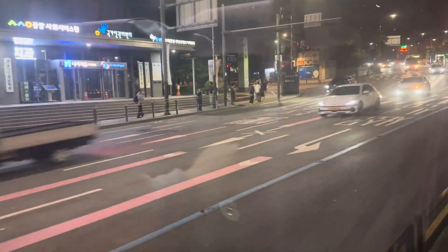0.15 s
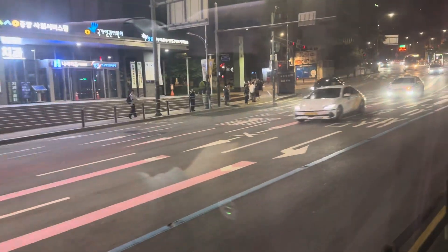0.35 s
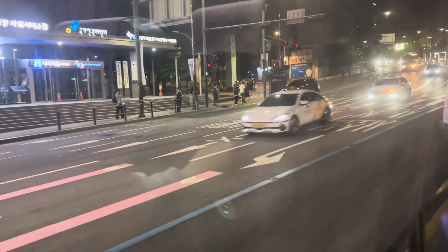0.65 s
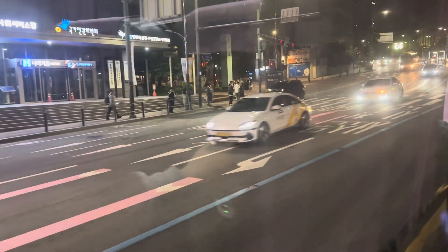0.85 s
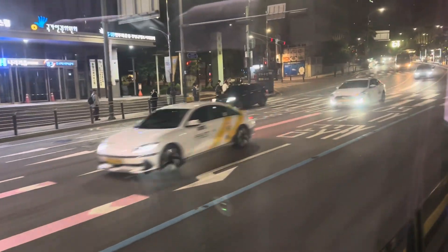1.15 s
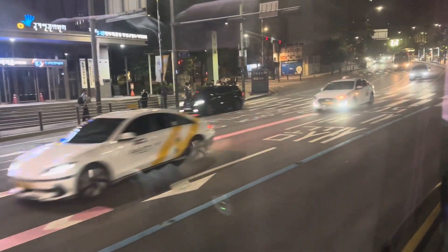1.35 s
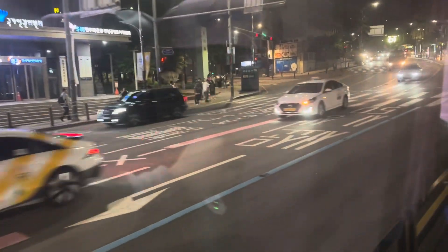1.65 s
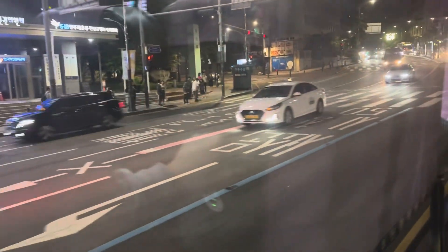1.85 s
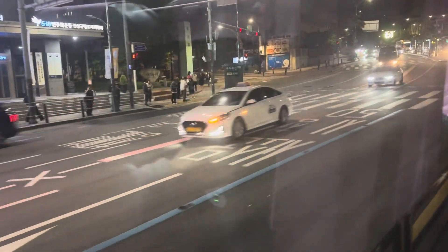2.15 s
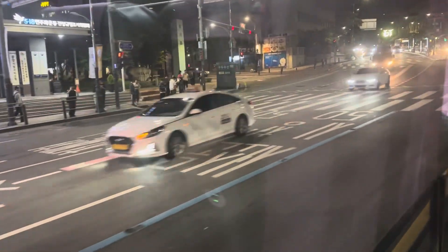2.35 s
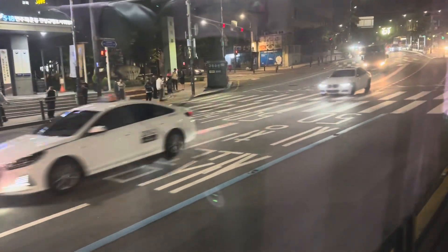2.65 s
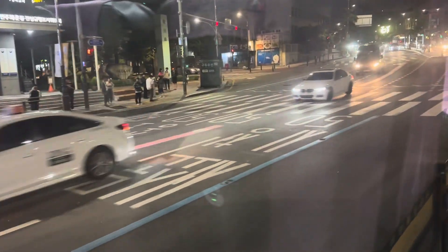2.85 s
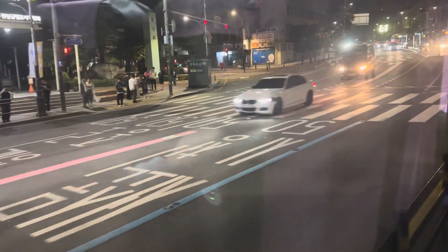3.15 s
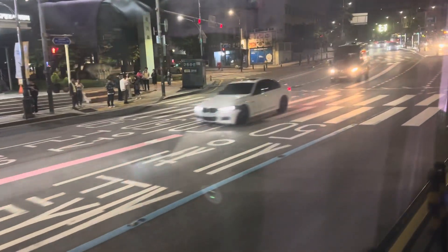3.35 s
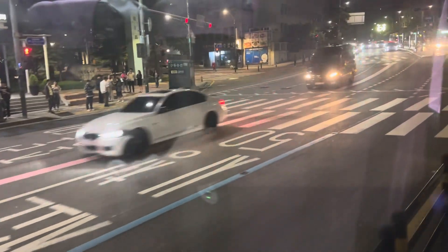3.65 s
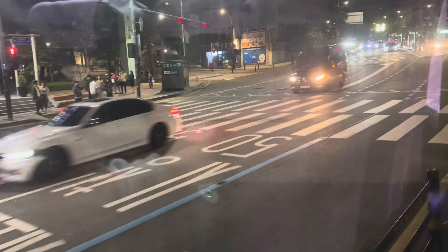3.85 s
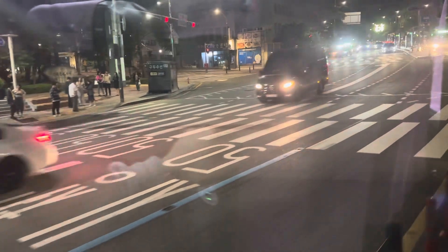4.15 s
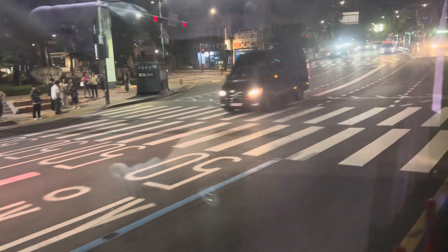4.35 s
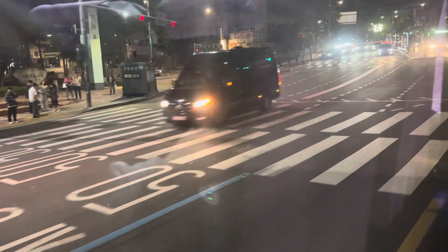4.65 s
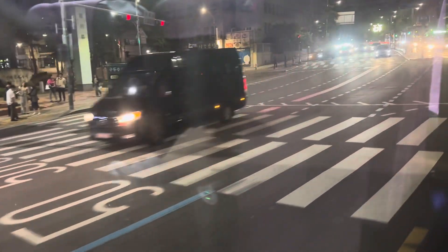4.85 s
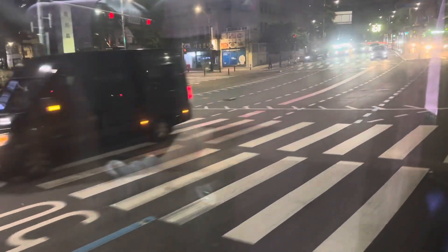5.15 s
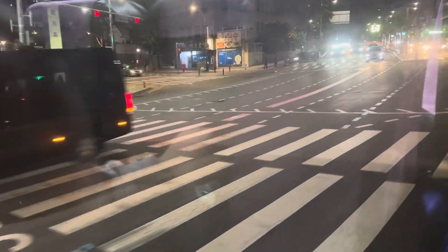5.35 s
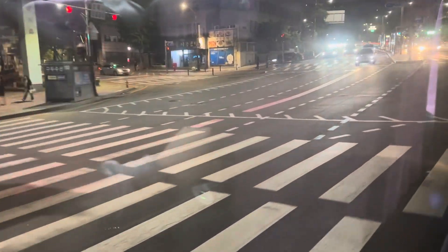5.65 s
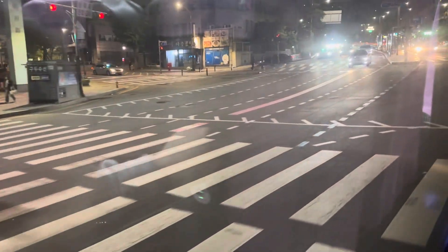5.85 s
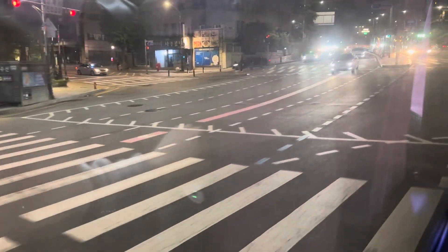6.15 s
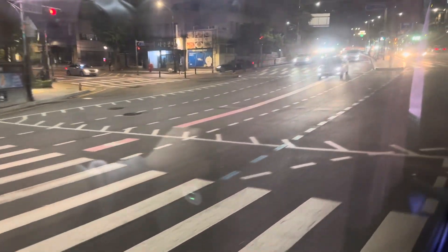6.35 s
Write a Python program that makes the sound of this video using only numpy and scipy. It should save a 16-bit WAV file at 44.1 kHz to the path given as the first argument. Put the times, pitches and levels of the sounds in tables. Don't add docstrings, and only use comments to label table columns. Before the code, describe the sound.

Low, heavy cabin rumble dominates this close stereo pickup by a bus window. The engine pulls loudly at first, whining upward, then drops away for a gear change. A short dull scraping drag shakes the pane, a faint gear whine rises, and the engine resumes at lower pitch, sagging and climbing. Uneven road booms in the cabin air, with small clicks, air spits and soft hiss.

```python
import sys
import numpy as np
from scipy import signal
from scipy.fft import rfft, irfft, next_fast_len
from scipy.io import wavfile
from scipy.ndimage import uniform_filter1d, minimum_filter1d

SR = 44100
rng = np.random.default_rng(int(sys.argv[2]) if len(sys.argv) > 2 else 0)


def store_pcm(level_fs):
    pcm = np.round(np.clip(level_fs, -1, 1) * 32767).astype(np.int16)
    wavfile.write(sys.argv[1], SR, np.atleast_2d(pcm).T)


def gain_from_db(level_db):
    decades = np.asarray(level_db, float) / 20
    return 10 ** decades


N = 287091


def rms_one(x):
    return x / np.sqrt(np.mean(x ** 2) + 1e-20)


def in_time(rows, fade=0.032):
    s, *columns = np.transpose(rows)
    t = np.arange(N) / SR
    gate = np.clip(np.minimum(t - s[0] + fade, s[-1] + fade - t) / fade, 0, 1)
    return [gate] + [np.interp(t, s, c) for c in columns]


def at_hz(points, hz):
    table_hz, table_db = np.transpose(points)
    return np.interp(np.log(hz), np.log(table_hz), table_db)


def drift(rate_hz):
    r = np.exp(-2 * np.pi * rate_hz * 40 / SR)
    slow = signal.lfilter([1], [1, -2 * r, r * r], rng.standard_normal(N // 40 + 2002))[2000:]
    return np.interp(np.arange(N) / 40, np.arange(len(slow)), rms_one(slow))


def resonate(x, modes):
    out = 0
    for k, (hz, width, db) in enumerate(modes):
        r = np.exp(-np.pi * width / SR)
        rise = [(1 - r * r) / 2, 0, (r * r - 1) / 2]
        ring = [1, -2 * r * np.cos(2 * np.pi * hz / SR), r * r]
        out = out + (-1) ** k * gain_from_db(db) * signal.lfilter(rise, ring, x + 1e-18)
    return out


def banded_noise(spectrum, patchy_db):
    out, together = 0, drift(5)
    lowest, highest = spectrum[0][0], spectrum[-1][0]
    edges = lowest * 2 ** np.arange(0, np.log2(highest / lowest) + .2, .4)
    white = rng.standard_normal((2, 2, N))
    for k, (low, high) in enumerate(zip(edges, edges[1:])):
        flicker_db = patchy_db * (0.55 * together + drift(9.4))
        gain = gain_from_db(at_hz(spectrum, np.sqrt(low * high)) + flicker_db)
        sos = signal.butter(2, [low, high], "band", fs=SR, output="sos")
        out = out + gain * signal.sosfilt(sos, white[k % 2])
    return rms_one(out)


def tone(hz, db, wobble_db=6.0, jitter=.004, jitter_rate=6.0):
    turns = np.cumsum(hz * (1 + jitter * drift(jitter_rate))) / SR + rng.random()
    return np.sqrt(2) * gain_from_db(db + wobble_db * drift(6.0)) * np.sin(2 * np.pi * turns)


def swells(rows, calm_db):
    t = np.arange(N) / SR
    return gain_from_db(calm_db) + sum(gain_from_db(db) * np.exp(-.5 * ((t - s) / spread_s) ** 2) for s, spread_s, db in rows)


def driven_modes(modes, steadiness):
    ringing = rms_one(resonate(resonate(rng.standard_normal((2, N)), modes), modes))
    return ringing / np.sqrt(uniform_filter1d(ringing ** 2, 6000) + steadiness)


# frequency in Hz, width in Hz, level in dB.
CABIN_AIR = [(77.36, 7.2, 1.5), (113.4, 2.7, -6.5)]
# centre in seconds, spread in seconds, level in dB.
BUMPS = [(.05, 0.034, -21), (.75, .07, -19), (1.15, 0.1, -22), (1.56, 0.16, -16.5), (1.88, 0.043, -21),
         (2.12, 0.098, -20), (2.35, 0.16, -30), (2.72, .13, -18.5), (3.15, 0.069, -24.5), (3.4, .06, -34.5),
         (3.68, 0.044, -23), (3.88, 0.065, -14), (4.35, 0.12, -20.5), (4.65, 0.1, -21), (5.37, 0.16, -33),
         (5.87, 0.086, -18), (6.1, .05, -24), (6.46, .06, -16.5)]


def cabin_boom():
    return swells(BUMPS, calm_db=-35.5) * driven_modes(CABIN_AIR, 0.37)


# frequency in Hz, width in Hz, level in dB.
SPRINGS = [(52.9, 26, 0)]
# centre in seconds, spread in seconds, level in dB.
JOLTS = [
    (.1, 0.068, -31),
    (.57, 0.11, -17.5),
    (1.5, 0.17, -30),
    (2.0, 0.1, -24),
    (2.42, 0.17, -22.5),
    (2.95, 0.054, -21.5),
    (3.18, 0.065, -24),
    (5.3, 0.22, -21.5),
    (6.35, 0.17, -25.5),
]


def body_sway():
    return swells(JOLTS, calm_db=-38.5) * driven_modes(SPRINGS, .3)


# loudest at in seconds, level in dB, rise in seconds, fall in seconds.
DRAGS = [
    (2.41, -14.5, 0.21, 0.16),
    (3.077, -31.5, 0.044, 0.051),
    (5.554, -34.5, 0.0536, 0.092),
]


def pressure():
    t = np.arange(N) / SR
    gains = []
    for s, db, rise, fall in DRAGS:
        away = (t - s) / np.where(t < s, rise, fall)
        gains.append(gain_from_db(db - 25 * np.minimum(away ** 2, 8)))
    return gains


# time in seconds, level against cruising in dB.
EFFORT = [(0, 6.5), (.3, 7), (.75, 8.5), (1.25, 9.5), (1.6, 4), (2.05, 0), (2.7, 1.5), (2.98, -4),
          (3.2, -1), (4.5, -0.5), (5.6, -.5), (6.51, 0)]
# frequency in Hz, density in dB per Hz.
RUMBLE = [(12, -31), (20, -14.5), (81, -6), (103, -2), (178, -20), (206, -15.5), (257, -17), (375, -16.5),
          (416, -44), (450, -32.5), (580, -64.5), (990, -120)]
# frequency in Hz, density in dB per Hz.
ROAR = [(350, -2), (420, -6), (500, 0), (700, -7), (800, -9.5), (1550, -20), (2500, -30.5), (3200, -60.5)]
# frequency in Hz, width in Hz, level in dB.
PANELS = [(173.7, 23.5, -8), (322, 15.6, -8), (493, 3.2, -7), (585, 2.9, -6), (739, 2.7, -9),
          (1143, 7.2, -6), (1545, 29, -19), (2644, 17, -4), (3430, 7.4, -17.5)]


def road():
    effort_db = in_time(EFFORT)[1]
    long_drag = gain_from_db(-1.5) * pressure()[0]
    shaking = gain_from_db(-29 + 0.98 * effort_db) + long_drag
    rumble = shaking * banded_noise(RUMBLE, patchy_db=0.35)
    roar = gain_from_db(-46 + 0.85 * effort_db) * banded_noise(ROAR, patchy_db=1.5)
    shaken = rumble + roar
    return shaken + 6.33 * resonate(shaken, PANELS)


def crackle():
    per_second, decay_s, lowest_hz = 6.0, 0.0038, 6500
    starts = (rng.random(N) < per_second / SR) * gain_from_db(-1.5 + 2.5 * rng.standard_normal(N))
    decay = signal.lfilter([1], [1, -np.exp(-1 / (decay_s * SR))], starts + 1e-18)
    bursts = decay * rng.standard_normal((2, N))
    return signal.sosfilt(signal.butter(2, lowest_hz, "high", fs=SR, output="sos"), bursts)


# frequency in Hz, density in dB per Hz.
HISS = [(2800, 1), (4000, -7.5), (5000, 2), (5700, -4), (6500, -7), (7500, -9), (9000, -7.5), (11000, -12),
        (13000, -12), (16000, -17)]


def air_hiss():
    level = gain_from_db(-67.5 + 0.39 * in_time(EFFORT)[1])
    return level * (banded_noise(HISS, patchy_db=1.6) + crackle())


# start in seconds, length in seconds, frequency in Hz,
# width in Hz, level in dB.
SQUEAKS = [(.06, .05, 15200, 500, -60), (.065, .04, 7300, 500, -62), (.545, .04, 15100, 400, -68),
           (.805, .07, 1590, 14, -47), (1.4, .04, 5700, 900, -60), (1.43, .1, 7300, 900, -63),
           (1.42, .12, 15000, 900, -64), (1.95, .3, 135, 14, -27), (2.55, .15, 185, 16, -29),
           (2.6, .05, 6600, 150, -68), (2.585, .08, 13000, 3000, -70), (2.81, .04, 1700, 300, -56),
           (2.9, .085, 4250, 800, -66), (2.88, .1, 5300, 600, -69), (3.57, .08, 1850, 40, -62),
           (3.6, .45, 322, 6, -41), (5.53, .08, 1620, 200, -53), (6.13, .09, 12500, 3000, -72),
           (6.1, .16, 6000, 4000, -69), (5.25, .3, 3690, 40, -76)]
# start in seconds, length in seconds, frequency in Hz.
SINGING = [(3.08, .28, 2680), (3.45, .3, 2900), (3.55, .22, 3190), (3.55, .12, 2670), (3.72, .12, 2680),
           (3.95, .12, 3190), (4.13, .19, 2690), (4.4, .12, 3190), (4.58, .14, 2830), (4.63, .3, 3180),
           (4.72, .2, 2800), (4.93, .08, 2920), (5.1, .35, 2685), (5.3, .35, 2675), (3.76, .07, 2690),
           (4.21, .08, 2690), (6.03, .24, 3400)]


def squeaks():
    out = np.zeros((2, N))
    singing = [(*row, 25, -72) for row in SINGING]
    for s, length, hz, width, db in SQUEAKS + singing:
        at, size = round(s * SR), round(length * SR)
        mode = [(hz, width, 0)]
        song = resonate(resonate(rng.standard_normal((2, size + 4000)), mode), mode)[:, 4000:]
        swell = np.sin(np.pi * np.arange(size) / size)
        out[:, at:at + size] += gain_from_db(db) * rms_one(song) * swell
    return out


# start in seconds, peak in dB, centre in Hz, 60 dB decay in seconds,
# left minus right in dB.
TICKS = [(0.079, -49, 11070, .03, 5.5), (0.1461, -58, 7670, 0.027, 1.5), (1.4109, -40.5, 9280, 0.041, 3),
         (1.4403, -45, 9000, 0.09, 3.5), (1.5105, -54.5, 8860, 0.057, 1.5), (2.1856, -43, 7130, 0.029, 4.5),
         (2.818, -49, 3830, 0.18, 5), (3.1025, -48.5, 8000, 0.026, 2), (3.389, -61.5, 10800, 0.091, 1.5),
         (3.7198, -63, 8040, 0.084, 5.5), (3.9644, -49, 5360, .03, 11.5), (5.239, -61, 5630, 0.11, 5),
         (5.54, -52.5, 2280, .25, 2.5), (6.168, -59, 6000, 0.11, -1.5), (6.3957, -58, 9300, 0.043, 2.5)]


def ticks():
    out, t = np.zeros((2, N)), np.arange(4000) / SR
    for s, db, hz, t60, pan in TICKS:
        noise = rng.standard_normal((2, 4000))
        burst = (noise + .3 * noise[::-1]) * gain_from_db(-60 * t / t60) * np.minimum(t / .001, 1)
        edges = [.45 * hz, min(2.2 * hz, 16000)]
        burst = signal.sosfilt(signal.butter(2, edges, "band", fs=SR, output="sos"), burst)
        burst *= gain_from_db(db + 5) / np.abs(burst).max(axis=1, keepdims=True)
        burst *= gain_from_db(np.array([[pan], [-pan]]) / 2)
        at = round(s * SR)
        out[:, at:at + 4000] += burst[:, :N - at]
    return out


# frequency in Hz, density in dB per Hz.
DRAG_COLOUR = [(70, -17.5), (150, -4), (260, -4.5), (480, 2.5), (570, -0.5), (810, -13.5), (1000, -21.5),
               (2000, -30), (3200, -36), (4700, -44.5), (5700, -50), (6800, -70), (9000, -71.5)]
# frequency in Hz, width in Hz, level in dB.
PANE = [(144, 160, -11), (351, 38, -1.5), (489, 24.5, -1.5), (604, 69, -18), (938, 20, -11.5)]
# frequency in Hz, width in Hz, level in dB.
FRAME = [(5650, 1000, -33)]


def drags():
    presses = pressure()
    sizes = gain_from_db(1.9 * np.minimum(rng.exponential(1, (2, N)), 3))
    slips = rng.random((2, N)) < 1500 / SR
    grains = sizes * rng.choice([-1, 1], (2, N)) * slips
    grains = signal.sosfilt(signal.butter(4, 1300, fs=SR, output="sos"), grains)
    frame_hz, frame_width, _ = FRAME[0]
    ringing = resonate(rng.standard_normal((2, N)), FRAME)
    bright = 3.55 * resonate(ringing, [(frame_hz, frame_width, 0)])
    rubbed = 0.77 * banded_noise(DRAG_COLOUR, patchy_db=-0.1) + 1.06 * rms_one(resonate(grains, PANE))
    near, far = sum(presses) * rubbed + presses[0] * bright
    return np.array([gain_from_db(2.5) * (near + .3 * far), gain_from_db(-5) * (.25 * near - far)])


def gear_whine():
    since = np.arange(N) / SR - 2.9
    return np.clip(10 * since, 0, 1) * tone(224.6 + 20 * since, -46, wobble_db=2.8, jitter=0.007)


# time in seconds, frequency in Hz, level in dB.
TURBO = [
    [(0, 8500, -84), (.3, 9000, -80), (.5, 9450, -75), (1, 10900, -72), (1.3, 11700, -71),
     (1.43, 11900, -72)],
    [(3.3, 6300, -89), (4.6, 7000, -85), (5.2, 7500, -81), (5.9, 8000, -88)],
]


def turbo_whistle():
    whistle = 0
    for rows in TURBO:
        gate, hz, db = in_time(rows)
        whistle = whistle + gate * tone(hz, db, wobble_db=3.5, jitter=.016, jitter_rate=250.0)
    return whistle


# time in seconds, four-stroke cycles per second.
FIRST_PULL = [
    (0, 8.45),
    (.3, 8.75),
    (.55, 9.3),
    (.8, 10.05),
    (1.05, 10.6),
    (1.3, 11),
    (1.42, 10.6),
    (1.58, 8.6),
]
# frequency in Hz, width in Hz, level in dB.
FLOOR_PANEL = [(309.5, 22, 3.5), (573, 81, -5.5)]


def knock():
    turns = np.cumsum(in_time(FIRST_PULL)[1]) / SR + .49
    thump = np.exp(2.5 * (np.cos(2 * np.pi * turns) - 1))
    start_db, growth_db_per_s, end_s = -33, 4.5, 1.34
    gate, db = in_time([(0, start_db), (end_s, start_db + growth_db_per_s * end_s)], fade=0.043)
    ringing = tone(FLOOR_PANEL[0][0], 0, wobble_db=1, jitter=.006)
    dull = signal.sosfilt(signal.butter(4, 800, fs=SR, output="sos"), rng.standard_normal(N))
    rattle = .4 * rms_one(resonate(dull, FLOOR_PANEL))
    return gate * gain_from_db(db) * rms_one(thump * (ringing + rattle))


# frequency in Hz, level in dB.
BODY = [(36, -1), (50, -3), (72, -1.5), (87, -6.5), (101, 9), (116, 8), (140, -2), (203, 2)]


def engine(pull, orders, strengths_db):
    gate, cycles = in_time(pull, fade=0.092)
    slowing = np.maximum(-np.gradient(cycles) * SR, 0)
    load_db = 0.62 * in_time(EFFORT)[1] - uniform_filter1d(slowing, size=2000)
    throb = np.cos(2 * np.pi * (np.cumsum(cycles) / SR + .5))
    out = 0
    for k, db in zip(orders, strengths_db):
        level_db = db + at_hz(BODY, k * cycles) + load_db
        order = tone(k * cycles, level_db, wobble_db=1.34, jitter=.005, jitter_rate=16.0)
        out = out + (1 + 0.0096 * k * throb) * order
    return gate * out


# time in seconds, four-stroke cycles per second.
SECOND_PULL = [
    (3.35, 6.2),
    (3.65, 6.14),
    (4.1, 6.33),
    (4.4, 6.78),
    (4.9, 6.4),
    (5.3, 6.58),
    (5.7, 7.1),
    (6.3, 8.05),
    (6.51, 8.33),
]
LOW_GEAR_ORDERS = (6, 7, 11, 12, 20, 40)
HIGH_GEAR_ORDERS = (6, 7, 12, 13)
LOW_GEAR_DB = (-28, -31.5, -43, -40.5, -32.5, -49.5)
HIGH_GEAR_DB = (-31.5, -27, -27, -31)


def diesel():
    low_gear = engine(FIRST_PULL, LOW_GEAR_ORDERS, LOW_GEAR_DB)
    return low_gear + engine(SECOND_PULL, HIGH_GEAR_ORDERS, HIGH_GEAR_DB)


# frequency in Hz, side minus mid in dB.
WIDTH = [(30, -19), (100, -14.5), (250, -13), (500, -1), (900, 2.5), (1800, -4), (4000, -3), (7000, 0.5),
         (8800, 9.5), (11000, 2.5), (12500, 0), (13500, -2), (15500, -9.5)]
# frequency in Hz, left minus right in dB.
LEFT_LEAN = [(30, 1.8), (125, 1), (300, 6.5), (1000, 2.5), (4000, 4.5), (9000, 1.5)]


def spread(mid, side):
    size, pad = next_fast_len(N + 8192), 4096
    hz = np.fft.rfftfreq(size, 1 / SR) + 1
    mid, side = rfft(np.pad([mid, side], [(0, 0), (pad, size - N - pad)], "reflect"))
    kin = 0.7 * hz / (hz + 400)
    side = np.sqrt(1 - kin ** 2) * side + 1j * kin * mid
    side = side * gain_from_db(at_hz(WIDTH, hz))
    lean = gain_from_db(at_hz(LEFT_LEAN, hz) / 2)
    return irfft([(mid + side) * lean, (mid - side) / lean], size)[:, pad:pad + N]


def scene():
    mid, side = cabin_boom() + body_sway() + road() + air_hiss() + squeaks()
    tones = gear_whine() + knock() + diesel()
    whistle = turbo_whistle()
    cabin = spread(mid + tones + whistle, side + .5 * tones + 0.71 * whistle)
    return cabin + drags() + ticks()


def band_limit(x):
    return signal.sosfilt(signal.butter(12, 15720, fs=SR, output="sos"), x)


def record(dry):
    room = minimum_filter1d(np.minimum(1, .8 / (np.abs(dry).max(axis=0) + 1e-9)), size=881)
    limiter = uniform_filter1d(room, size=441)
    fade = .65 - .35 * np.cos(np.pi * np.minimum(np.arange(N)[::-1] / 200, 1))
    return band_limit(dry * limiter * fade)


dry = scene()
out = record(dry)
store_pcm(out)
```